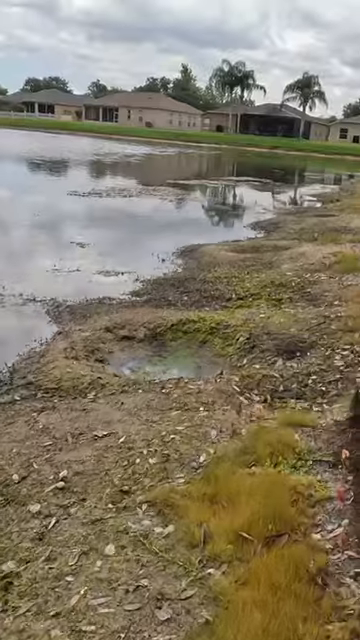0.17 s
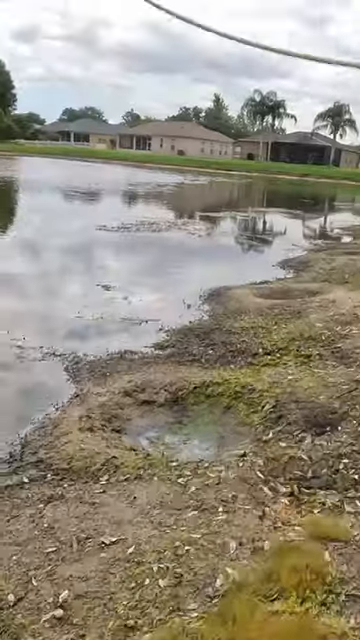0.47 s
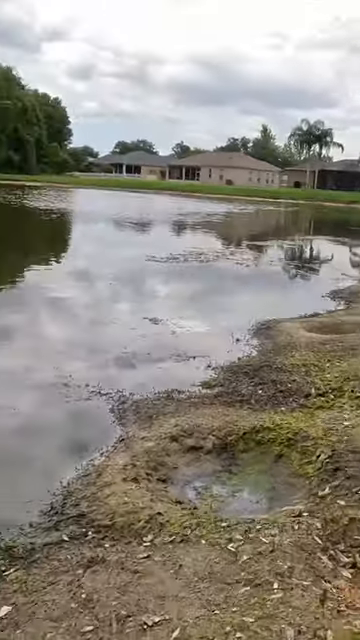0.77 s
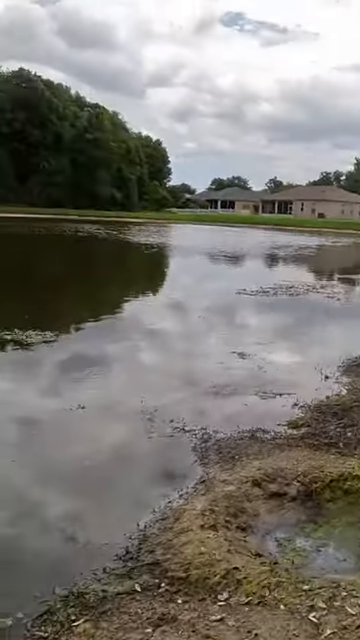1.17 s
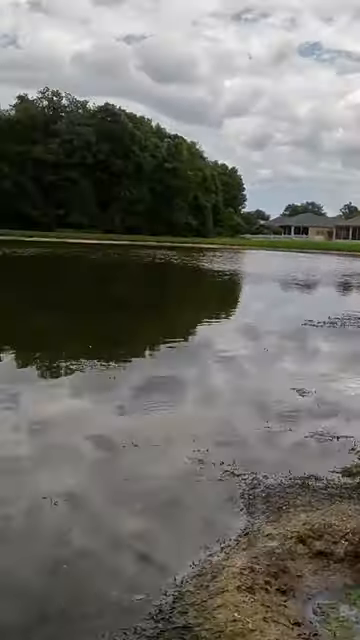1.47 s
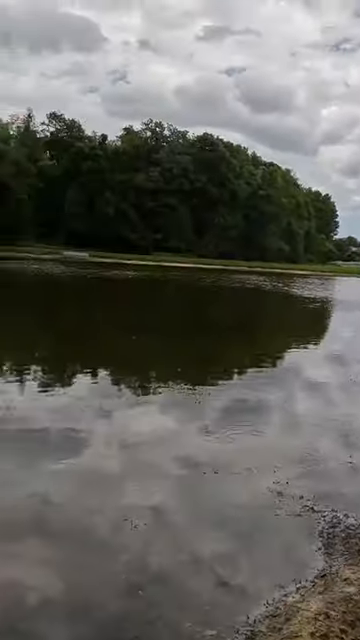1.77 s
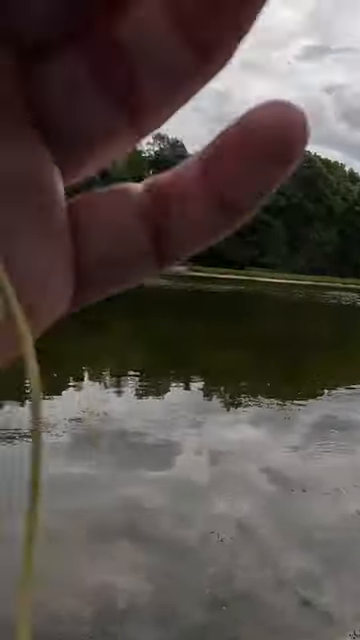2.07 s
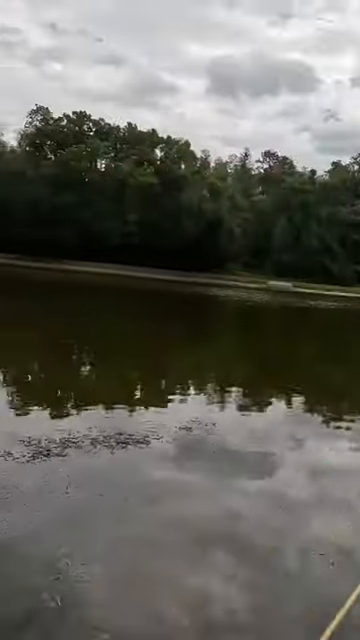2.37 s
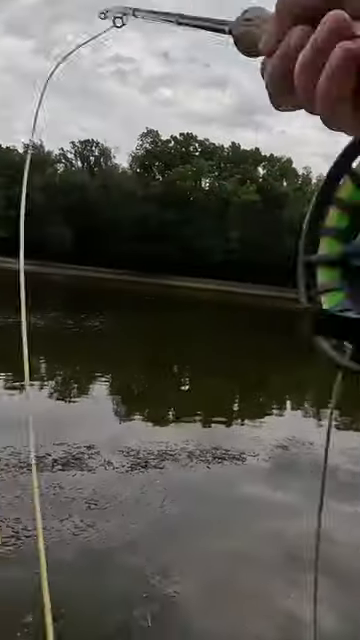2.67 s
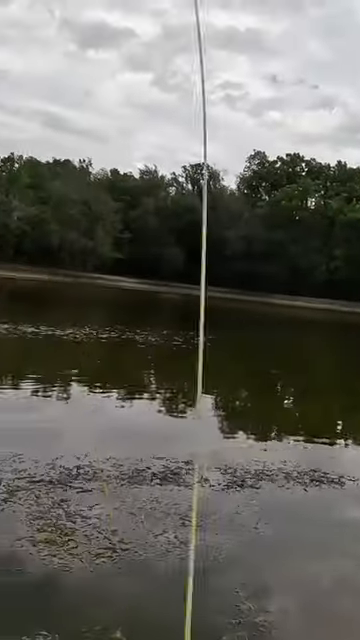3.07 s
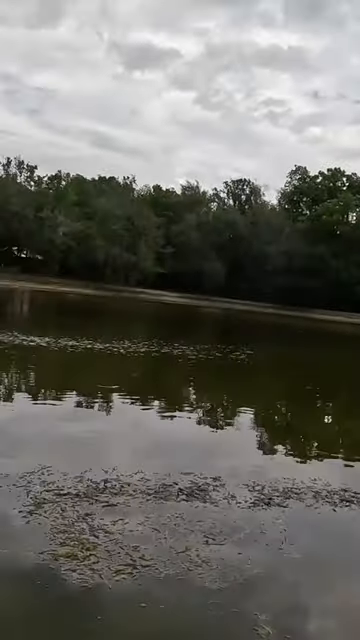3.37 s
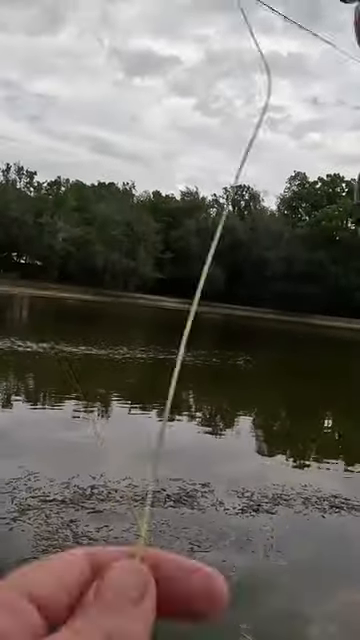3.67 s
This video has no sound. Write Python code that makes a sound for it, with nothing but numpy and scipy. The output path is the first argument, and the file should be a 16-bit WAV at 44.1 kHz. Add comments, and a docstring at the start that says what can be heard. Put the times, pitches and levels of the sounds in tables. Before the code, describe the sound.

Soft swishes of slack fly line with tackle knocks, birds whistling beside a quiet pond

```python
"""Fly casting on the bank of a pond. Still air, a breeze on the microphone (both shaped noise) and a far engine
(harmonics) run throughout. Birds (gliding sines with scattered echoes) whistle, knocks on the tackle (decaying
sines, noise ticks) and swishes of slack line (gliding bands of friction noise) come and go. Later the line rasps
through fingers and guides (slips exciting narrow rings), then loose line runs out in a fluttering whirr."""
import sys
import numpy as np
from scipy import signal
from scipy.fft import rfft, irfft
from scipy.io import wavfile
from scipy.ndimage import map_coordinates

SR = 44100
rng = np.random.default_rng(int(sys.argv[2]) if len(sys.argv) > 2 else 0)


def inscribe(sig):
    """Save sig as 16-bit PCM at rate SR to the path in sys.argv[1].

    A 1-D sig is mono; a 2-D sig holds one channel per row.
    Samples are clipped to [-1, 1] before scaling.
    """
    pcm = np.round(np.clip(np.atleast_2d(sig).T, -1, 1) * 32767)
    wavfile.write(sys.argv[1], SR, pcm.astype(np.int16))


N = 168903
T = np.arange(N) / SR
HZ = np.maximum(np.arange(N // 2 + 1) * SR / N, 1)


def from_db(db):
    """Decibels to amplitude ratio."""
    return 10 ** (np.asarray(db) / 20)


def rms_one(x):
    """Scale to rms 1 over all channels."""
    return x / np.sqrt(np.mean(x ** 2) + 1e-20)


def in_time(rows):
    """Interpolate (s, value) rows over the scene."""
    return np.interp(T, *np.transpose(rows))


def over_hz(points):
    """Interpolate (Hz, value) rows along log frequency."""
    hz, value = np.transpose(points)
    return np.interp(np.log(HZ), np.log(hz), value)


def colour(x, db):
    """Shape a steady signal's spectrum; rms 1."""
    return rms_one(irfft(rfft(x) * from_db(db), N))


def hiss():
    """White noise, spread 1."""
    return rng.standard_normal(N)


def drift(corner_hz):
    """Low-passed random wander with spread 1."""
    return rms_one(irfft(rfft(hiss()) / (1 + (HZ / corner_hz) ** 2), N))


def pan(left_over_right_db):
    """Left and right gains with rms 1."""
    gains_db = np.array([[left_over_right_db], [-left_over_right_db]]) / 2
    return rms_one(from_db(gains_db))


def spread(draw):
    """Stereo from two unrelated draws, mostly alike in both ears."""
    # left-right correlation: freq_hz, correlation [ratio]
    likeness = [(50,1),(300,0.81),(1200,0.78),(4000,1),(12000,1)]
    alike = np.clip(over_hz(likeness), 0, .99)
    mid = rfft(draw()) * np.sqrt(1 + alike)
    side = rfft(draw()) * np.sqrt(1 - alike)
    return irfft(np.array([mid + side, mid - side]), N)


def slips():
    """Friction: a dense rain of tiny slips of uneven size and random sign."""
    slips_per_s, mean_boost_db = 3500, 0.51
    hits = rng.random(N) < slips_per_s / SR
    sign = rng.choice([-1, 1], N)
    boost_db = mean_boost_db * np.minimum(rng.exponential(1, N), 5)
    return hits * sign * from_db(boost_db)


def ring(x, hz, t60_s):
    """Two-pole resonator: a unit click sets a sine of height 1 ringing."""
    r = from_db(-60 / (t60_s * SR))
    w = 2 * np.pi * hz / SR
    return signal.lfilter([0, np.sin(w)], [1, -2 * r * np.cos(w), r * r], x + 1e-18)


def glide(x, ratio):
    """Shift a steady noise in pitch by a ratio that changes with time."""
    return map_coordinates(x, [np.cumsum(ratio) % (N - 1)], mode="mirror")


def still_air():
    """Broad stereo noise, flickering slightly in level."""
    # air spectrum: freq_hz, gain_db
    air_colour = [(15, -36), (25, -6), (53, -8.5), (81, -5.5), (167, -7.5), (219, -7.5), (344, -15.5),
                  (811, -26.5), (1350, -15.5), (1760, -21.5), (2180, -21), (4260, -29.5), (7280, -31.5),
                  (12100, -50.5), (15000, -82)]
    level_db, flicker_db = -53.5, 1.3
    return colour(spread(hiss), over_hz(air_colour)) * from_db(level_db + flicker_db * drift(31.0))


def breeze():
    """Low noise; the stronger the breeze, the more it buffets each microphone port on its own."""
    # breeze strength: time_s, level_db
    strength = [(.03,-29),(.155,-35),(.2,-41),(.55,-47),(.87,-43),(1.1,-51),(1.95,-48),(2.6,-50),(3.15,-50)]
    # breeze spectrum: freq_hz, gain_db
    breeze_colour = [(20,5.5),(45,2),(80,-1),(160,-12),(300,-19),(600,-36.5),(1500,-63)]
    gust_db = -35  # port difference is full from here up
    level_db = in_time(strength)
    own = np.minimum(from_db(level_db - gust_db), 1)
    buffets = hiss() + own * hiss() * np.array([[.5], [-.5]])
    low_cut_db = 20 * np.log10(1 + (15 / HZ) ** 2)
    return colour(buffets, over_hz(breeze_colour) - low_cut_db) * from_db(level_db)


def engine():
    """Far engine: harmonics of an unsteady rotation, each wavering in level."""
    # harmonics: multiple [x fundamental], rms_db
    orders = [(1,-2),(2,-9),(3,-12.5)]
    # overall gain: time_s, gain_db
    gain = [(0,-64),(1.1,-50),(1.8,-50),(2.7,-51.5),(3.2,-51.5),(3.7,-46.5)]
    base_hz, waver_db = 72.3, 1
    turn = 2 * np.pi * np.cumsum(base_hz * (1 + 0.0062 * drift(4.9))) / SR
    hum = 0
    for multiple, rms_db in orders:
        tone = np.sin(multiple * turn + rng.uniform(0, 2 * np.pi))
        hum = hum + from_db(rms_db + waver_db * drift(3.9)) * tone
    return np.sqrt(2) * hum * from_db(in_time(gain))


def birds():
    """Gliding sines whose pitch jitter grows from pure to buzzy with height, scattered by the trees."""
    # whistles: start_s, length_s, start_hz, middle_hz, end_hz, gain_db, echo_db
    whistles = [(1.375,0.28,1720,2180,2580,-48.5,-6),(1.492,0.06,3960,3410,3240,-62,5.5),(1.626,0.036,2550,2900,3680,-46,-1.5),(1.666,0.18,3130,2660,2220,-53.5,-5),
                (1.755,0.045,5090,4860,4320,-49,1.5),(1.792,0.053,4430,3490,3040,-42.5,-3.5),(1.885,0.029,1750,1960,2090,-47,-8),
                (1.947,0.044,2750,2480,2220,-46,-3.5),(2.0,0.074,2210,2166,2190,-53.5,-12),(2.111,0.046,2770,3150,3770,-40,-4),(2.167,0.06,4150,2950,2620,-39,-3.5),
                (2.365,0.039,3670,3270,3110,-48,0),(2.45,0.22,3164,2803,2550,-50.5,1)]
    # repeated long falling whistle: start_s, length_s, gain_db, echo_db
    falls = [(.018,0.21,-35,-12),(0.354,.21,-39.5,-7.5),(0.818,0.2,-65.5,0),(2.883,.21,-49.5,-6),(3.23,.15,-45,-7)]
    # another bird's soft arched chirp: start_s, gain_db
    chirps = [(0.829,-58.5),(1.423,-51),(1.749,-52)]
    fall_hz, chirp_hz = (2905, 2559, 2296), (1250, 1510, 1213)  # start, middle, end
    chirp_s, chirp_echo_db = 0.07, -10
    attack_s, release_s, fade_db, waver_db = 0.011, 0.0023, 2, 3
    buzz_hz, buzz_power, jitter_at_buzz = 2513, 3, 0.00502
    trees_t60_s, pan_db = 0.35, 0.8

    notes = list(whistles)
    notes += [(s, length_s, *fall_hz, db, echo_db) for s, length_s, db, echo_db in falls]
    notes += [(s, chirp_s, *chirp_hz, db, chirp_echo_db) for s, db in chirps]
    direct, sent = np.zeros(N), np.zeros(N)
    waver = from_db(waver_db * drift(26))
    jitter = jitter_at_buzz * drift(286)
    for s, length_s, first_hz, middle_hz, last_hz, db, echo_db in notes:
        u = np.clip((T - s) / length_s, 0, 1)
        hz = np.polyval(np.polyfit([0, .5, 1], [first_hz, middle_hz, last_hz], 2), u)
        hz = hz * (1 + jitter * (hz / buzz_hz) ** buzz_power)
        attack = np.clip((T - s) / attack_s, 0, 1)
        release = np.clip((s + length_s - T) / release_s, 0, 1)
        envelope = attack * release * waver * from_db(db - fade_db * (u + 0.5))
        note = envelope * np.sin(2 * np.pi * np.cumsum(hz) / SR)
        direct += note
        sent += note * from_db(echo_db)
    tail = spread(hiss)[:, :SR] * from_db(-60 * T[:SR] / trees_t60_s)
    scatter = rms_one(tail) / np.sqrt(SR)  # unit energy per ear on average
    echo = signal.fftconvolve(sent[None], scatter)[:, :N]
    return (direct + echo) * pan(pan_db)


def knocks():
    """Each knock is a short hollow ring, a thump and a sharp tick; faint stray ticks come from the gripped rod."""
    # knocks: start_s, body_db, thump_db, tick_db
    hits = [(.058,-34.5,-25,-27.5),(.277,-39,-36.5,-40),(.495,-31,-56,-30.5),(0.535,-37,-52,-35.5),(.623,-58,-27.5,-36),(.696,-30.5,-30,-31),(0.748,-48,-54,-36),(0.818,-52,-60,-34.5),(1.145,-34,-63,-33),(1.175,-33.5,-51,-26),(2.703,-25,-26,-31),(2.927,-37,-63,-36),(3.095,-37.5,-62,-35),(3.162,-35.5,-47,-30.5),(3.179,-29,-56,-28.5),(3.255,-39.5,-58,-50)]
    # tackle modes: freq_hz, gain_db, t60_s
    tackle = [(607,-19,0.02),(992,-5.5,0.033),(1150,-5.5,0.023),(1353,-5,0.015),(1854,-10.5,0.02)]
    thump_hz, thump_t60_s = 270, 0.019
    tick_t60_s, tick_lowpass_hz = 0.0096, 4450
    creaks_per_s, creak_db, creak_spread_db = 9, -44, 3.5
    pan_db = 3.5

    out = np.zeros(N)
    creaks = rng.random(N) < creaks_per_s / SR
    strikes = creaks * from_db(creak_db + creak_spread_db * hiss())
    age_s = T[:SR // 10]
    for s, body_db, thump_db, tick_db in hits:
        start = int(s * SR)
        at = slice(start, start + len(age_s))
        for hz, db, t60_s in tackle:
            mode_hz = hz * (1 + rng.normal(0, 0.045))
            mode = np.sin(2 * np.pi * mode_hz * age_s) * rng.choice([-1, 1])
            out[at] += from_db(body_db + db - 60 * age_s / t60_s) * mode
        thump = np.sin(2 * np.pi * thump_hz * age_s)
        out[at] += from_db(thump_db - 60 * age_s / thump_t60_s) * thump
        strikes[start] += from_db(tick_db)
    decay = from_db(-60 / (tick_t60_s * SR))
    ticks = signal.lfilter([1], [1, -decay], strikes + 1e-18) * hiss()
    ticks = signal.sosfilt(signal.butter(2, tick_lowpass_hz, fs=SR, output="sos"), ticks)
    return (out + ticks) * pan(pan_db)


def swishes():
    """Slack line in the air: each swish swells and fades in one gliding band of fine friction."""
    # swishes: peak_s, rise_s, fall_s, level_db, centre_hz, width_octaves, pan_db, glide_octaves_per_s
    sweeps = [(0.149,0.14,0.1,-51.5,2840,0.99,1,-0.5),(.85,0.1,0.085,-59.5,2530,0.67,5,-2.5),(1.14,0.047,0.052,-47,1510,1.33,1.5,-2.5),(2.17,0.035,0.05,-50.5,3960,0.54,-1,1),(2.294,0.04,0.089,-46,3430,0.75,-0.5,2.5),(2.349,0.13,0.1,-58,8460,0.27,4,-5),(3.255,0.056,0.11,-49,3570,0.76,0.5,0),(3.54,0.27,0.17,-56,4500,0.073,-4,0.5),(3.745,0.064,0.036,-45,3900,0.63,-1.5,-2),(3.808,0.017,0.026,-41.5,3240,0.64,-1,0)]
    edge_db, skirt_db, rough_db = 10, -32, 2.5
    out, rub = 0, spread(slips)
    for s, rise_s, fall_s, db, hz, width_octaves, pan_db, octaves_per_s in sweeps:
        away = np.where(T < s, (s - T) / rise_s, (T - s) / fall_s)
        octaves = np.log2(HZ / hz)
        band_db = np.maximum(-4.3 * (octaves / width_octaves) ** 2, skirt_db - 4 * np.abs(octaves))
        ratio = 2 ** (octaves_per_s * np.clip(T - s, -rise_s, fall_s))
        swish = np.array([glide(ear, ratio) for ear in colour(rub, band_db)])
        out = out + swish * from_db(db - edge_db * np.minimum(away, 10) ** 1.92) * pan(pan_db)
    return out * from_db(rough_db * drift(34))


def line_pull():
    """Slips in the guides excite the taut line's rings, pitched by its speed, over a broader rubbing hiss."""
    # hard pull: time_s, level_db (before rasp_gain_db)
    pull = [(2.56,-74),(2.63,-57),(2.666,-47),(2.70,-45),(2.758,-38.5),(2.82,-34.5),(2.834,-27),(2.874,-30),(2.884,-41),(2.912,-36),(2.926,-31.5),(2.962,-55.5),(3.012,-55),(3.06,-83)]
    # rasp pitch, following line speed: time_s, pitch [ratio]
    pitch = [(2.65,0.99),(2.77,1.096),(2.83,0.99),(2.875,1.0),(2.93,0.89)]
    # rasp spectrum: freq_hz, gain_db
    rasp_colour = [(600,-60),(1400,-8.5),(2200,-30),(3000,-3.5),(3950,7),(4700,2.5),(5800,-3),(6800,-22),(8500,-46),(13000,-47)]
    # rubbing hiss spectrum: freq_hz, gain_db
    rub_colour = [(400,-8),(800,-8),(1400,1.5),(2500,9),(4500,4),(7000,-0.5),(9000,-12.5),(12000,-18.5),(15000,-38)]
    # narrow rings of the taut line: freq_hz, width_hz, gain_db
    rings = [(3780,25,-28),(3900,36,-20),(4700,50,-16),(5770,63,-15.5)]
    rasp_gain_db, rough_db, pan_db = 2.5, 2.5, -3
    rub_max_db, rub_top_db = -42.5, -45  # hiss follows the pull up to rub_top_db, then holds

    level_db, rub = in_time(pull), slips()
    rasp = colour(rub, over_hz(rasp_colour))
    for hz, width_hz, db in rings:
        t60_s = np.log(1000) / np.pi / width_hz
        rasp = rasp + from_db(db) * rms_one(ring(rub, hz, t60_s))
    rasp = glide(rms_one(rasp), in_time(pitch))
    rasp = rasp * from_db(level_db + rough_db * drift(105) + rasp_gain_db) * pan(pan_db)
    rub_db = rub_max_db + np.minimum(level_db - rub_top_db, 0) + rough_db * drift(58)
    rubbing = from_db(rub_db) * colour(spread(slips), over_hz(rub_colour))
    return (rasp + rubbing) * ((T > pull[0][0]) & (T < pull[-1][0]))


def line_run():
    """Loose line flutters as it runs out; its friction whirr sways in level and pitch."""
    # run-out: time_s, level_db
    run = [(3.2,-57),(3.3,-50),(3.39,-44),(3.56,-45),(3.63,-50),(3.72,-54),(3.83,-56)]
    # whirr spectrum: freq_hz, gain_db
    run_colour = [(900,-15.5),(1500,-11),(2100,-6.5),(2600,8),(3050,8),(3600,-11.5),(5800,-11),(8000,-32)]
    flutter_hz, level_depth, pitch_sway = 34.5, 0.19, 0.047  # mean rate; depths as ratios
    flutter = np.sin(2 * np.pi * np.cumsum(flutter_hz * (1 + .25 * drift(13.5))) / SR)
    friction = colour(spread(slips), over_hz(run_colour))
    whirr = np.array([glide(ear, 1 + pitch_sway * flutter) for ear in friction])
    return whirr * from_db(in_time(run)) * (1 + level_depth * flutter) * (T > run[0][0])


def scene():
    """Sum of all sources."""
    outdoors = still_air() + breeze() + engine()
    return outdoors + birds() + knocks() + swishes() + line_pull() + line_run()


def record(dry):
    """The left port lags in the mid treble; the sound opens after a moment of silence; the top is cut."""
    # left port phase lead: freq_hz, lead_rad
    port_phase = [(400,-0.1),(2000,-0.97),(2900,-1.18),(4300,-0.77)]
    start_s, fade_in_s, stopband_hz = .035, .002, 16500
    left = irfft(rfft(dry[0]) * np.exp(1j * over_hz(port_phase)), N)
    heard = np.array([left, dry[1]]) * np.clip((T - start_s) / fade_in_s, 0, 1)
    return signal.sosfilt(signal.cheby2(12, 70, stopband_hz, fs=SR, output="sos"), heard)


dry = scene()
out = record(dry)
inscribe(out)
```